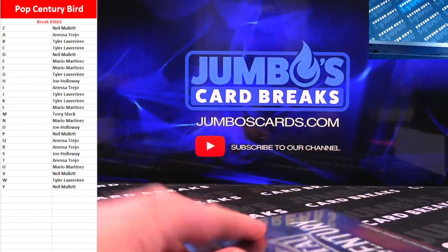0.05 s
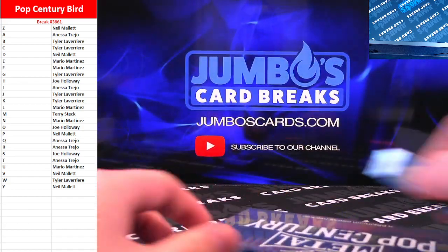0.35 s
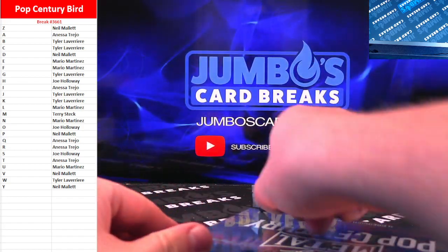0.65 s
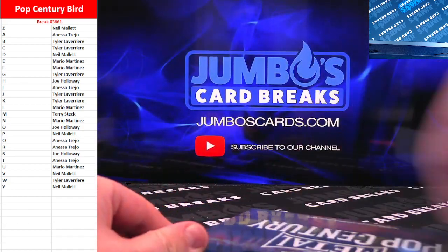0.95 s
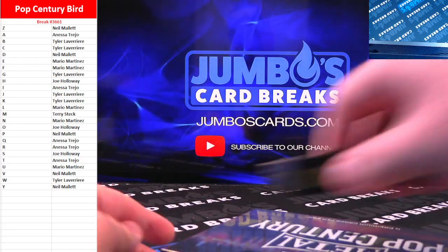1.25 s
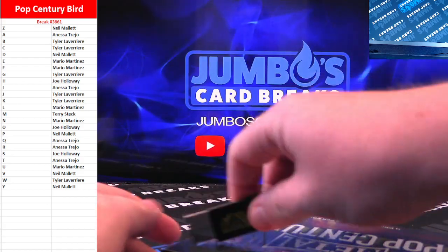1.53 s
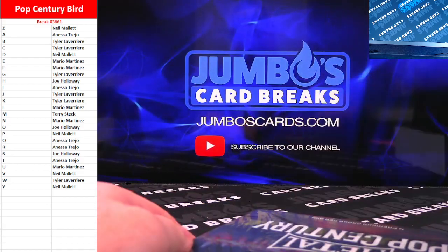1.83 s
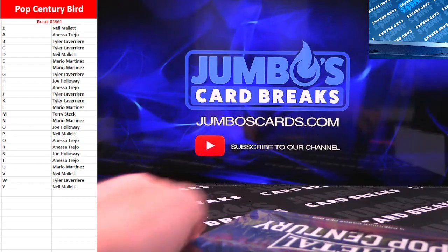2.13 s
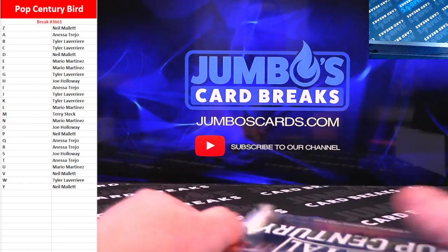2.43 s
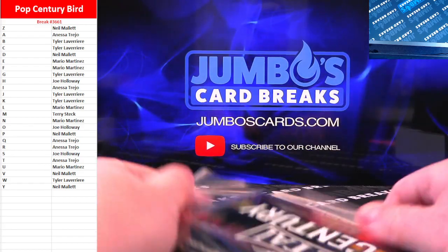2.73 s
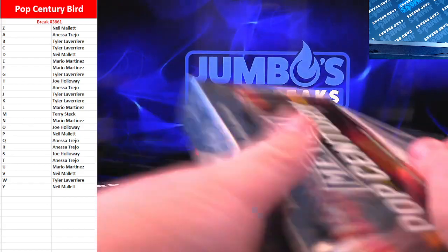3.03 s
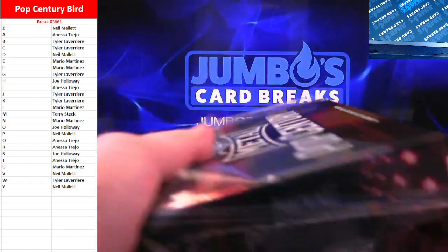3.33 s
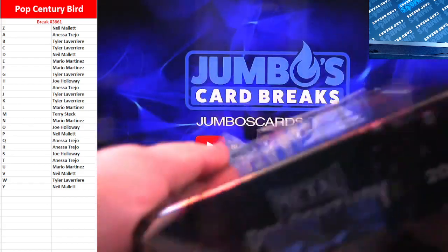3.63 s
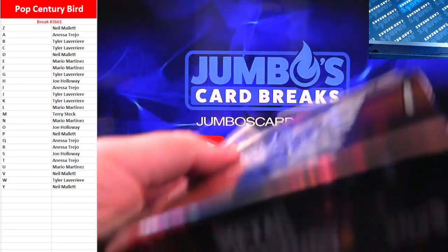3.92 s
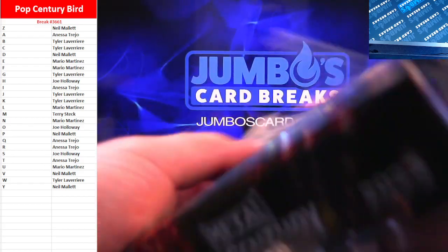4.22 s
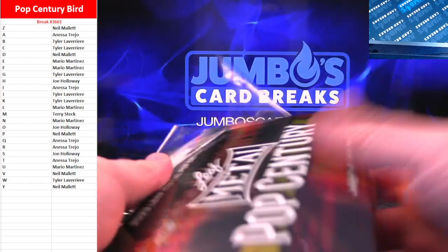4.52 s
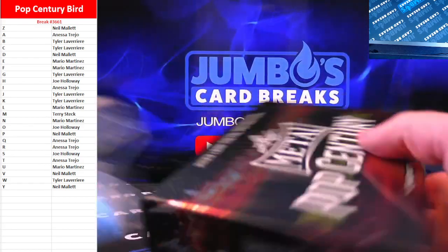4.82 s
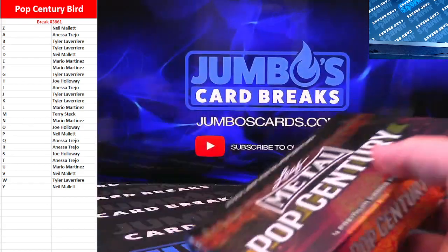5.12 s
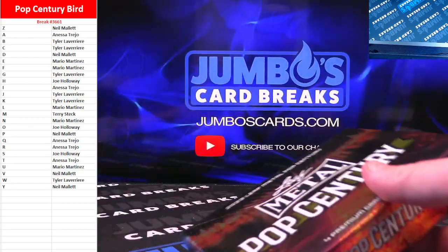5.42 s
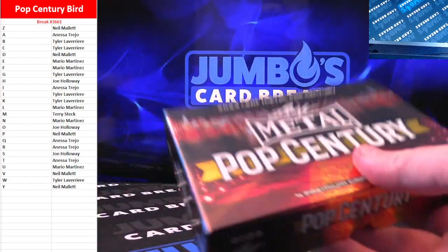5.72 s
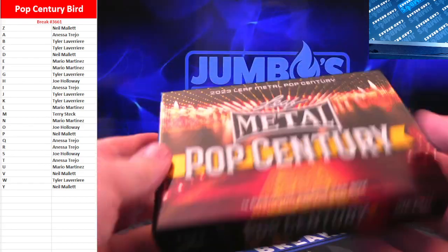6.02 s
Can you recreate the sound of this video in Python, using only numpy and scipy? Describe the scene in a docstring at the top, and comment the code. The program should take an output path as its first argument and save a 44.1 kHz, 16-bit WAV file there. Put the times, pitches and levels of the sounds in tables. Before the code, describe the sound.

A fan rumbles steadily in a small room while a cardboard box is unwrapped near the microphone, in mono. After a tap, a blade scrapes through the plastic twice and lands on a mat with a soft thud. Thin film crackles in flurries and tears free with a loud snap and a smaller one as fingers knock the box. A brief hollow slide, dry clicks and a faint finger squeak follow.

```python
"""A fan hums in a small room; close by, a cutter taps a shrink-wrapped cardboard box and slits the wrap twice.
The blade sticks and slips, drumming the lid and rasping through fibres, then drops on the padded table.
The film rips and is pulled off, crinkling as its creases buckle, with two snaps as it tears free.
Fingers knock on the ringing panels as the box is turned; it slides out of its sleeve, card edges click
and a fingertip squeaks on the glossy lid. All of it is heard in mono."""
import sys
import numpy as np
from scipy import signal
from scipy.fft import rfft, irfft
from scipy.io import wavfile
from scipy.ndimage import uniform_filter1d, map_coordinates

SR = 44100
rng = np.random.default_rng(int(sys.argv[2]) if len(sys.argv) > 2 else 0)


def output_pcm(signal):
    """Save a mono or channel-first signal as 16-bit PCM at the path in sys.argv[1].

    Samples are clipped to [-1, 1] before scaling.
    """
    pcm = np.clip(np.atleast_2d(signal).T, -1, 1) * 32767
    wavfile.write(sys.argv[1], SR, np.round(pcm).astype(np.int16))


N = 267290
TIME = np.arange(N) / SR
AFTER = TIME[:SR // 3]  # seconds since a blow
TOP_HZ = 16000


def undb(db):
    """Decibels to gain."""
    return 10 ** (np.asarray(db) / 20)


def unit(x):
    """Scale to rms 1."""
    return x / np.sqrt(np.mean(x ** 2))


def peak(x, db, size=176):
    """Set the level of the loudest 4 ms."""
    return x * undb(db) / np.sqrt(uniform_filter1d(x ** 2, size, mode="constant").max())


def add(out, s, sound):
    """Mix a sound in at s seconds."""
    i = int(s * SR)
    out[i:i + len(sound)] += sound[:N - i]


def fade(t60):
    """Exponential decay, 60 dB down after t60 seconds."""
    return np.exp(-np.log(1000) * AFTER / t60)


def through(x, response):
    """Pass a sound through an impulse response."""
    return signal.fftconvolve(x, response)[:len(x)]


def colour(x, points, size=4096):
    """Minimum-phase EQ through (Hz, dB) points."""
    hz, db = np.transpose(points)
    bins = np.maximum(np.arange(size // 2 + 1) * SR / size, 1)
    cepstrum = irfft(np.log(undb(np.interp(np.log(bins), np.log(hz), db))))
    cepstrum[1:size // 2] *= 2
    cepstrum[size // 2 + 1:] = 0
    return through(x, irfft(np.exp(rfft(cepstrum))))


def band(x, hz, kind, order=3):
    """Butterworth filter."""
    return signal.sosfilt(signal.butter(order, hz, kind, fs=SR, output="sos"), x)


def ring(x, modes):
    """Drive damped modes, each given as (Hz, dB at resonance, t60 in seconds)."""
    response = sum(undb(db) * np.cos(2 * np.pi * hz * AFTER) * fade(t60) * 2 / fade(t60).sum()
                   for hz, db, t60 in modes)
    return through(x, response)


def glide(x, ratio):
    """Bend all resonances of a steady sound by a moving pitch ratio."""
    return map_coordinates(x, [np.cumsum(ratio)], order=3, mode="mirror")


def walk(rate):
    """Smooth random drift with a spread near 1, turning rate times a second."""
    step = int(SR / rate)
    return unit(uniform_filter1d(np.repeat(rng.standard_normal(N // step + 1), step), step))[:N]


def grains(rate, spread_db):
    """Random tiny clicks, about rate a second, a few much larger than the rest."""
    size = undb(spread_db * np.minimum(rng.standard_exponential(N), 4))
    return unit((rng.random(N) < rate / SR) * rng.choice([-1, 1], N) * size)


def crack(length_s, reflections=4):
    """One sharp push, scattered by quick reflections inside the material; its spectrum stays flat."""
    push = -signal.unit_impulse(len(AFTER))
    for share in rng.uniform(.15, 1, reflections):
        allpass = np.zeros(int(share * length_s * SR / 2) + 2)
        allpass[0], allpass[-1] = 1, -.5
        push = signal.lfilter(allpass[::-1], allpass, push)
    return push


def rattle(t60, one_in=8):
    """A fading run of tiny contacts, with about the energy of one crack."""
    contacts = rng.standard_normal(len(AFTER)) * (rng.integers(one_in, size=len(AFTER)) == 0)
    return fade(t60) * contacts / np.sqrt(np.sum(fade(t60) ** 2) / one_in)


def blow(x, db, thud_db, tick_db):
    """Balance a hit: a mid clack at db, with a low thud and a high tick set relative to it."""
    thud = peak(band(x, 690, "low", order=2), db + thud_db)
    clack = peak(band(x, [700, 3500], "band", order=2), db)
    tick = peak(band(x, 3450, "high", order=2), db + tick_db)
    return thud - clack + tick  # neighbouring bands meet in opposite phase


# The fan's rumble and hiss. Each row: frequency in Hz, gain in dB.
FAN_EQ = [(12, -55.5), (20, -11.5), (91, -3.5), (127, -3.5), (163, -12), (198, -10), (228, -15), (347, -19),
          (574, -28.5), (624, -29), (760, -32.5), (2500, -46.5), (5000, -52.5), (16000, -57.5)]
# The fan's hum tones. Each row: pitch in Hz, width in Hz, level in dB.
HUM_TONES = [(81.2, 14, -49), (121, 8, -58.5), (138.7, 10, -53.5)]


def fan():
    """The bed: a fan's steady low rumble, with wavering hum tones and a faint hiss."""
    rumble = undb(-45) * unit(colour(rng.standard_normal(N), FAN_EQ))
    hum = np.zeros(N)
    for hz, width, db in HUM_TONES:
        phase = 2 * np.pi * hz * TIME
        hum += undb(db) * (walk(width * 2) * np.cos(phase) + walk(width * 2) * np.sin(phase))
    return rumble + hum


# The film's bright tick and the loose sheet's darker flutter. Each row: frequency in Hz, gain in dB.
FILM_EQ = [(1470, -34.5), (2500, -1), (2640, -6), (2990, 0), (3800, 0), (6010, 0.5), (7950, 4),
           (11800, -4.5), (14800, -3.5), (16000, -7.5)]
SHEET_EQ = [(200, -16.5), (420, -0.5), (750, -1.5), (1000, 0.5), (1400, -3), (2100, 0.5), (3000, -2.5),
            (5000, -11), (10000, -75.5)]
# Loose patches of film that flick over now and then. Each entry: pitch in Hz.
PATCH_PITCHES = [990, 1325, 1790]
# Fader ride for film in the hands. Each row: time in seconds, crackle and flutter in dB before trim.
RUSTLE_RIDE = [(2.18, -61, -53), (2.27, -56, -60), (2.43, -58, -59), (2.59, -51, -51.5), (2.74, -66.5, -75),
               (2.96, -60, -49.5), (3.1, -54.5, -58), (3.18, -54, -52), (3.55, -54.5, -54),
               (3.71, -54, -55.5), (4.08, -56.5, -50), (4.32, -49.5, -48.5), (4.6, -50, -49),
               (4.76, -56.5, -57), (5.07, -51.5, -56), (5.17, -53, -50), (5.41, -70.5, -65),
               (6.05, -68.5, -62.5)]
# Tugs at the film, the first very faint. Each row: start in seconds, hold in seconds, crackle in dB,
# flutter in dB relative to the crackle.
FILM_TUGS = [(0.01, 0.14, -70.5, 3.5), (2.62, 0.022, -55, -2.5), (2.976, 0.12, -54.5, 6),
             (3.399, 0.13, -53.5, 1), (3.698, 0.013, -45.5, -2), (3.913, 0.18, -46, -2),
             (4.453, 0.023, -43, -2), (4.672, 0.087, -48, -6.5), (4.987, 0.028, -51.5, -6.5),
             (5.736, 0.037, -59.5, 3)]
TUG_ATTACK_DB_PER_S, TUG_RELEASE_DB_PER_S = 450, 223
TICK_HZ = 7900  # centre pitch of a buckling crease


def crinkle():
    """Small creases buckle in flurries, harder at each tug; some tick, others shake the loose sheet."""
    times, crackle_db, flutter_db = np.transpose(RUSTLE_RIDE)
    tick_gain = undb(np.interp(TIME, times, crackle_db, left=-200, right=-200) - 3)
    flutter_gain = undb(np.interp(TIME, times, flutter_db, left=-200, right=-200) - 4)
    for s, hold, db, sheet_db in FILM_TUGS:
        attack_db = TUG_ATTACK_DB_PER_S * np.maximum(s - TIME, 0)
        release_db = TUG_RELEASE_DB_PER_S * np.maximum(TIME - s - hold, 0)
        pull = undb(db - attack_db - release_db)
        tick_gain = np.hypot(tick_gain, pull)
        flutter_gain = np.hypot(flutter_gain, pull * undb(sheet_db))
    flurry = undb(3.8 * walk(90))
    buckles = grains(rate=900, spread_db=2.5) * flurry
    ticks = colour(buckles + .5 * grains(rate=4000, spread_db=0.5), FILM_EQ)
    stretch = undb(2.5 * walk(25))  # taut film is brighter
    ticks = unit(band(ticks, TICK_HZ, "low") / stretch + band(ticks, TICK_HZ, "high") * stretch)
    flutter = unit(colour(buckles + grains(rate=2500, spread_db=7), SHEET_EQ))
    flicks = unit(sum(ring(grains(rate=19, spread_db=3.5), [(hz, 0, .022)]) for hz in PATCH_PITCHES))
    lone_ticks = unit(colour(grains(rate=65, spread_db=1.5), FILM_EQ))
    crackle = ticks + undb(-6.5) * lone_ticks
    sheet = undb(-1.5) * flutter + undb(-6.5) * flicks
    return crackle * tick_gain + sheet * flutter_gain


# The ring of the box panels. Each row: pitch in Hz, gain in dB, t60 in seconds.
BOX_MODES = [(237, -9, 0.13), (329.7, 1, 0.11), (458, -6.5, 0.07), (555, 3.5, .07), (623, -5.5, 0.078),
             (950, 1.5, 0.03), (1290, -7, 0.055), (1470, -2.5, 0.034), (1750, -12, 0.015),
             (2130, -18, 0.04)]


def struck_box(push):
    """Each blow lands on a different spot, so each panel mode answers with a random strength."""
    return ring(push, [(hz, db + 2.5 * rng.standard_normal(), t60) for hz, db, t60 in BOX_MODES])


# The dull tone of a contact. Each row: frequency in Hz, gain in dB.
CONTACT_EQ = [(100, -14.5), (220, 4), (500, 1), (780, -4.5), (1500, -1.5), (2600, -5), (4000, -15),
              (8000, -18), (16000, -43)]
# Hits on the box. Each row: start in seconds, then level, relative thud and relative tick in dB
# before trim, thud pitch in Hz, rattle in dB relative to the crack.
BOX_KNOCKS = [(0.3787, -29.5, 7.5, -22, 300, -3.5), (1.349, -42, 14, -3, 242, 11),
              (3.2716, -19, -1, -32, 800, -9), (3.2781, -19, -8.5, -28, 635, -12),
              (3.337, -23.5, -10, -16, 376, 11), (3.699, -29, -5, 0.5, 786, -1.5),
              (3.885, -32, 10, -23, 480, 1), (3.971, -34.5, -3, -14, 343, 6)]


def knocks():
    """Blows on the box: the struck panel thuds at its own pitch and the others ring briefly."""
    out = np.zeros(N)
    for s, db, thud_db, tick_db, hz, rattle_db in BOX_KNOCKS:
        push = colour(crack(length_s=0.00051) + undb(rattle_db) * rattle(t60=0.038), CONTACT_EQ)
        body = push + undb(1) * struck_box(push) + undb(13) * ring(push, [(hz, 0, .02)])
        add(out, s, blow(body, db - 6, thud_db + 1, tick_db - 1))
    return out


# The scrape of torn fibres. Each row: frequency in Hz, gain in dB.
SCRAPE_EQ = [(130, -7), (210, 5), (350, 14), (600, -5.5), (950, -11), (1200, -11.5), (1550, -11.5),
             (2600, -14), (4300, -25), (7800, -25), (11000, -35), (16000, -40)]
# The ring of blade and cut card. Each row: pitch in Hz, gain in dB, t60 in seconds.
BLADE_MODES = [(900, -0.5, 0.024), (1478, 0.5, 0.034), (1940, -1, 0.026), (2420, -2.5, 0.029),
               (4070, -1.5, .014)]
# Cutter strokes. Each row: start in seconds, length in seconds, level in dB, relative drone in dB and
# chatter in Hz where the lid is loosest, hiss growth in dB, bite at the far edge in dB.
CUTTER_STROKES = [(0.57, 0.228, -35.5, 8, 330.3, 17, 0.5), (1.476, 0.212, -35.5, 11, 175.7, 25, 6)]
BITE_S, BITE_DB, LIFT_DB_PER_S = 0.098, 11.5, 460  # swell as the blade sinks in, fade as it lifts
LOOSEST_AT, EDGE_AT, EDGE_WIDTH = 0.65, 0.88, 0.035  # shares of the stroke
DRONE_RISE_DB, DRONE_FALL_DB = 69, 54  # per stroke length, before and after the loosest spot
PRESS_DB, CHATTER_OCTAVES = 6.5, 2.5  # rise of rasp level and stick-slip rate over one stroke
BLADE_GLIDE, BLADE_WAVER = 0.14, 0.0255  # shares of pitch: rise over one stroke, random waver


def slit(s, length, db, drone_db, chatter_hz, hiss_rise_db, edge_db):
    """The blade sticks and slips ever faster, drumming the lid; torn fibres rasp higher and hiss more."""
    along = (TIME - s) / length
    travel = np.clip(along, 0, 1)
    bite_db = -BITE_DB * np.maximum(1 - (TIME - s) / BITE_S, 0) ** 2
    contact = undb(db + bite_db - LIFT_DB_PER_S * np.maximum(TIME - s - length, 0))
    rasp_db = edge_db * np.exp(-((along - EDGE_AT) / EDGE_WIDTH) ** 2) - PRESS_DB * (1 - travel)
    hiss_db = -6.5 - hiss_rise_db * (1 - travel)
    past_loosest = along - LOOSEST_AT
    lid_db = drone_db - np.maximum(-DRONE_RISE_DB * past_loosest, DRONE_FALL_DB * past_loosest)
    slip_hz = chatter_hz * 2 ** (CHATTER_OCTAVES * (travel - LOOSEST_AT))
    slip_count = np.floor(np.cumsum(slip_hz * np.exp(.25 * walk(300))) / SR)
    slips = np.diff(slip_count, prepend=0) / np.sqrt(slip_hz)  # even power at any rate
    cavity = ring(slips, [(480, 0, 0.012)])
    drone = unit(band(cavity + undb(-2) * ring(cavity, BOX_MODES), [230, 800], "band"))
    fibres = grains(rate=3000, spread_db=2) * undb(1.5 * walk(140))
    scrape = colour(fibres, SCRAPE_EQ)
    bend = 1 + BLADE_GLIDE * (travel - LOOSEST_AT) + BLADE_WAVER * walk(40)
    blade = glide(ring(scrape, BLADE_MODES), bend)
    rasp = unit(band(scrape + undb(7) * blade, [800, 4500], "band"))
    rumble = undb(-3.5) * unit(band(scrape, 1200, "low"))
    hiss = unit(band(scrape, 5300, "high"))
    return contact * ((rasp + rumble) * undb(rasp_db) + drone * undb(lid_db) + hiss * undb(hiss_db))


# The woody tone of a card edge. Each row: frequency in Hz, gain in dB.
EDGE_EQ = [(120, -6), (300, 7), (700, -6), (1200, -9), (2000, -8), (3000, -14.5), (4200, -28), (8000, -34),
           (16000, -56)]
# Edge clicks. Each row: start in seconds, then level, relative thud and relative tick in dB before trim.
EDGE_TAPS = [(1.865, -54.5, -1, 1), (2.749, -37.5, -14, -39), (2.888, -45.5, 8, 7),
             (2.92, -30.5, -31.5, -10), (2.941, -32, -26, -15), (5.694, -24.5, -14, -4),
             (5.738, -33.5, -7, -4), (5.893, -45, -12, -12)]


def edge_taps():
    """Stiff card edges meet fingers and mat with a dry, woody click."""
    out = np.zeros(N)
    for s, db, thud_db, tick_db in EDGE_TAPS:
        push = colour(crack(length_s=0.0022) + undb(7.5) * rattle(t60=0.05), EDGE_EQ)
        body = push + undb(-2) * struck_box(push)
        add(out, s, blow(body, db - 6.5, thud_db - 1, tick_db - 3))
    return out


# The ring of the cutter on the table top. Each row: pitch in Hz, gain in dB, t60 in seconds.
LANDING_MODES = [(239, -4, 0.34), (345, 4, 0.035), (412, 1, 0.15), (494, -2, 0.12), (600, -3, 0.057),
                 (3000, -6, 0.0023), (3480, -7, 0.01), (6900, -36, 0.0082)]
# Bounces. Each row: start in seconds, then level, relative thud and relative tick in dB before trim.
CUTTER_BOUNCES = [(2.0764, -34, 8.5, -1.5), (2.103, -43, 15, 8.5), (2.165, -42.5, 13, -12),
                  (2.203, -54.5, 18, -16)]


def dropped_cutter():
    """The cutter lands on the mat and rocks to rest; the table top booms under it."""
    out = np.zeros(N)
    for s, db, thud_db, tick_db in CUTTER_BOUNCES:
        push = band(crack(length_s=0.0018) + undb(2.5) * rattle(t60=0.072), 11500, "low", order=2)
        body = undb(-23) * colour(push, CONTACT_EQ) + ring(push, LANDING_MODES)
        add(out, s, blow(body, db - 7, thud_db + 6, tick_db - 1))
    return out


def rip(start_s, length_s, db):
    """The tear runs on from the slit in quick, uneven jerks: a thin, very bright crackle."""
    jerks = grains(rate=900, spread_db=3) * undb(3 * walk(110))
    gate = uniform_filter1d(1. * ((TIME > start_s) & (TIME < start_s + length_s)), size=260)
    bright = band(jerks, 6600, "high", order=5)
    return undb(db) * gate * unit(band(bright, 8500, "low", order=1))


# Single crease pops. Each row: start in seconds, then level and relative flutter in dB before trim.
CREASE_POPS = [(2.206, -33, -16), (2.2646, -28, -16), (2.3311, -34.5, 2), (2.4354, -43, 11),
               (2.55, -48, 13), (2.625, -29.5, -2), (2.733, -33.5, -5), (2.9694, -27, 1),
               (3.0201, -35.5, -2), (3.087, -29.5, -4), (3.1557, -37, -20), (3.175, -44, -20),
               (3.4103, -37, -14), (3.2, -32, 8), (3.2198, -40, 16), (3.6272, -26.5, -9.5),
               (4.1471, -31.5, -18), (4.2079, -37, -1), (4.3253, -33.5, -7), (4.361, -43, 7),
               (4.441, -30, 1.5), (4.458, -27.5, -2), (4.636, -30.5, -12), (4.683, -35, -14),
               (4.71, -31, -5), (4.842, -29.5, -28), (5.367, -39, -20)]
FLUTTER_HZ, FLUTTER_SPREAD, TICK_SPREAD = 1005, 0.098, 0.24  # spreads are shares of pitch


def creases():
    """Larger creases pop one at a time; the patch of film around each flutters briefly."""
    out = np.zeros(N)
    for s, db, sheet_db in CREASE_POPS:
        patch_hz = FLUTTER_HZ * np.exp(FLUTTER_SPREAD * rng.standard_normal())
        push = crack(length_s=.0012) + undb(2) * rattle(t60=0.031)
        patch = colour(push, SHEET_EQ) + undb(16) * ring(push, [(patch_hz, 0, .014)])
        tick_hz = min(TICK_HZ * np.exp(TICK_SPREAD * rng.standard_normal()), TOP_HZ)
        tick = colour(push + undb(8) * ring(push, [(tick_hz, 0, .002)]), FILM_EQ)
        add(out, s, peak(tick, db - 11) + peak(patch, db + sheet_db - 10))
    return out


# The tone of taut film tearing free. Each row: frequency in Hz, gain in dB.
SNAP_EQ = [(120, -9), (300, 5), (520, 7.5), (800, 3), (1350, 3), (2200, -3), (4000, -9), (5500, -10),
           (7500, -5), (11000, -12.5), (16000, -19)]
# Snaps. Each row: start in seconds, then level, relative thud and relative tick in dB before trim.
FILM_SNAPS = [(3.2572, -11.5, -16.5, -2.5), (3.8843, -28.5, -12, 13.5)]


def snaps():
    """The stretched film gives way with a crack, jolts the box and crackles as it goes slack."""
    out = np.zeros(N)
    for s, db, thud_db, tick_db in FILM_SNAPS:
        push = colour(crack(length_s=.0009) + undb(-1) * rattle(t60=0.15), SNAP_EQ)
        body = push + undb(-7) * struck_box(push)
        add(out, s, blow(body, db - 4.5, thud_db - 1, tick_db - 1))
    return out


def slide(start_s, length_s, db, sleeve_hz):
    """Card drags out of its loose sleeve of film; both ring in a short, hollow scrape."""
    rub = colour(grains(rate=1900, spread_db=3.5), CONTACT_EQ)
    hollow = ring(rub, BOX_MODES + [(sleeve_hz, 1, .003)])
    swell = np.sin(np.pi * np.clip((TIME - start_s) / length_s, 0, 1))
    return undb(db) * swell * unit(band(rub + undb(2) * hollow, 400, "high", order=1))


# Skin on the glossy lid. Each row: start in seconds, length in seconds, pitch in Hz, level in dB.
FINGER_SQUEAKS = [(5.723, 0.077, 6300, -59), (5.784, 0.03, 6120, -56.5)]


def squeaks():
    """A fingertip sticks and slips in a thin, brief whistle."""
    out = np.zeros(N)
    for s, length, hz, db in FINGER_SQUEAKS:
        swell = np.hanning(int(length * SR))
        whistle = unit(ring(rng.standard_normal(len(swell)), [(hz, 0, .006)]))
        add(out, s, undb(db) * swell * whistle)
    return out


# The small room's standing waves. Each row: pitch in Hz, gain in dB.
STANDING_WAVES = [(238, 1), (329, 3.5), (447, 5.5), (632, 1.5)]


def room(x, wet_db, t60, treble_t60, standing_t60, build_s):
    """Near walls answer within milliseconds and die fast, treble first; low standing waves ring on."""
    noise = rng.standard_normal(len(AFTER))
    lows = band(noise, 1920, "low", order=1) * fade(t60)
    highs = band(noise, 2300, "high", order=1) * fade(treble_t60)
    tail = (lows + highs) * np.clip(AFTER / build_s, 0, 1) ** 2
    standing = ring(x, [(hz, db, standing_t60) for hz, db in STANDING_WAVES])
    return x + standing + undb(wet_db) * through(x, tail / np.linalg.norm(tail))


def scene():
    """The handling sounds play in the room over the fan, the same in both channels."""
    hands = knocks() + edge_taps() + dropped_cutter() + snaps()
    hands += sum(slit(*stroke) for stroke in CUTTER_STROKES)
    hands += crinkle() + rip(start_s=2.19, length_s=0.08, db=-51) + creases()
    hands += slide(start_s=4.44, length_s=0.076, db=-38.5, sleeve_hz=1470) + squeaks()
    mono = room(hands, wet_db=-7, t60=0.25, treble_t60=0.19, standing_t60=0.4, build_s=0.0084) + fan()
    return np.array([mono, mono])


def record(dry):
    """A steep low-pass cuts the very top."""
    return signal.sosfilt(signal.ellip(10, .2, 80, TOP_HZ, fs=SR, output="sos"), dry)


dry = scene()
out = record(dry)
output_pcm(out)
```